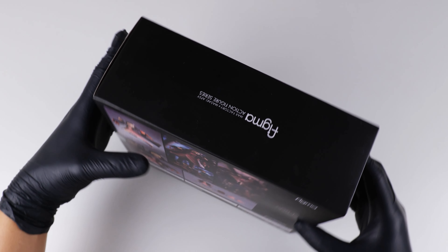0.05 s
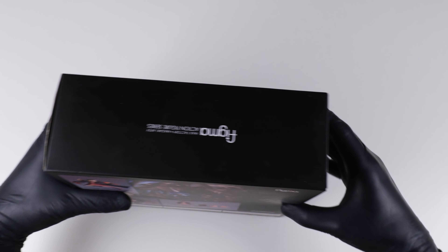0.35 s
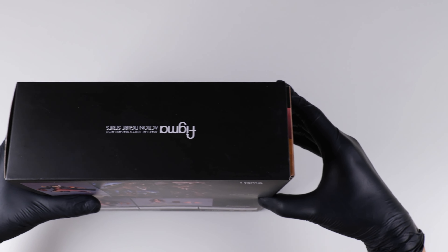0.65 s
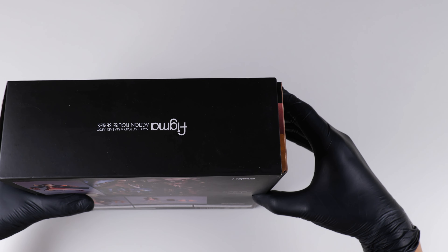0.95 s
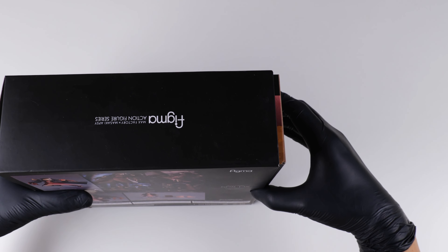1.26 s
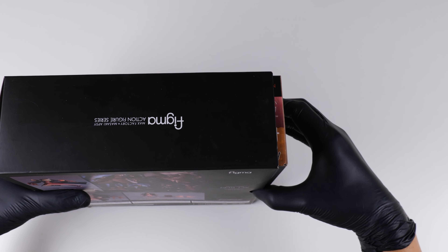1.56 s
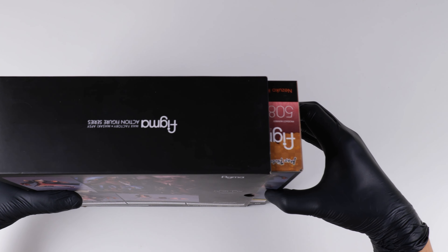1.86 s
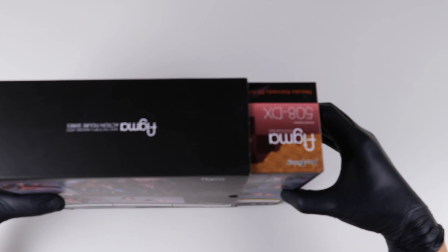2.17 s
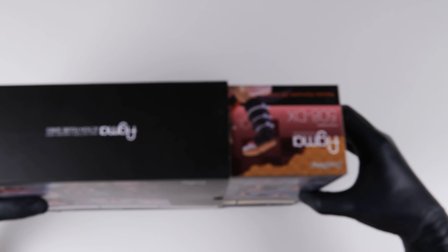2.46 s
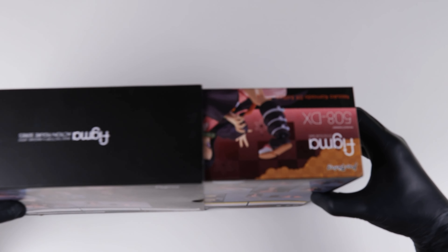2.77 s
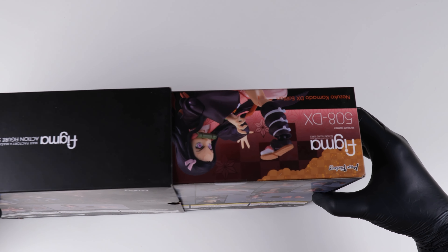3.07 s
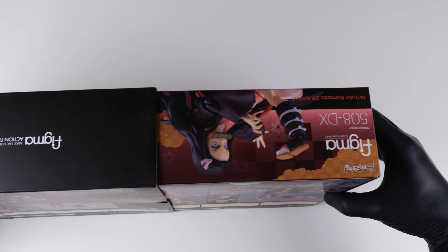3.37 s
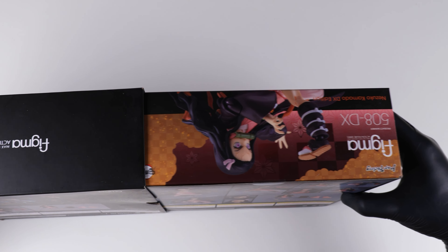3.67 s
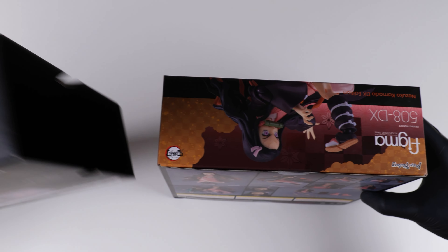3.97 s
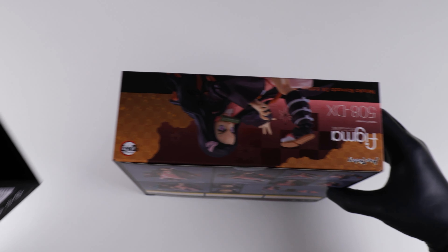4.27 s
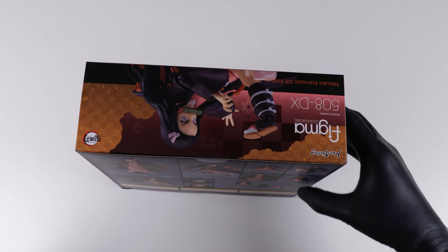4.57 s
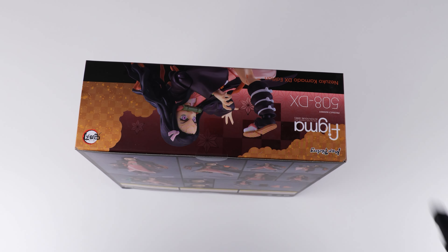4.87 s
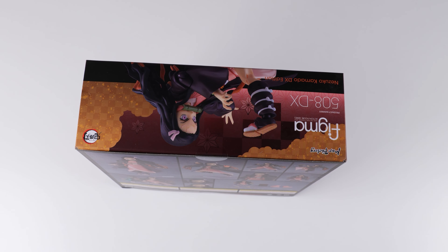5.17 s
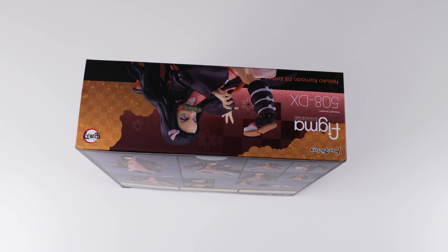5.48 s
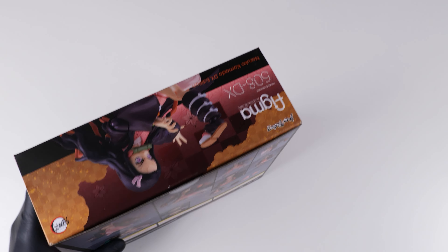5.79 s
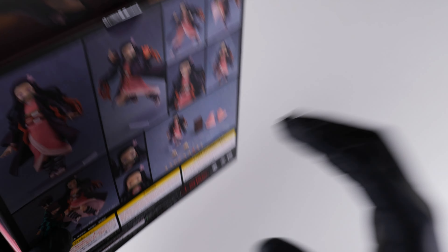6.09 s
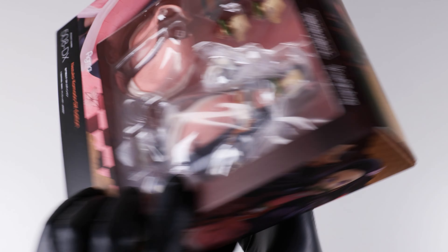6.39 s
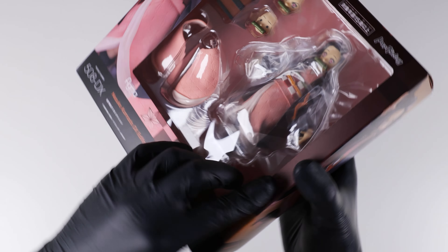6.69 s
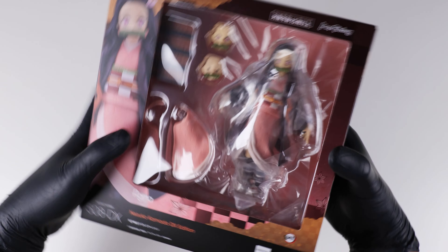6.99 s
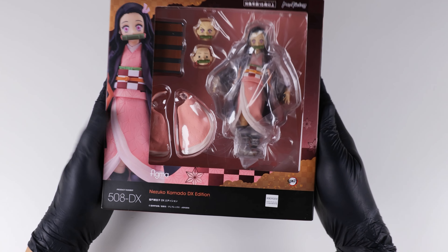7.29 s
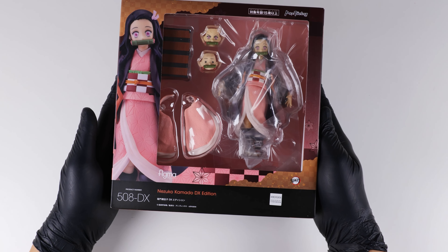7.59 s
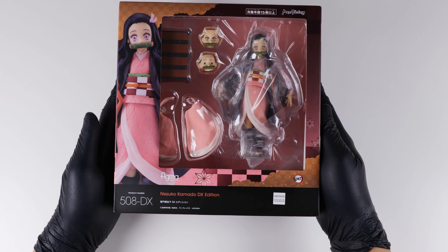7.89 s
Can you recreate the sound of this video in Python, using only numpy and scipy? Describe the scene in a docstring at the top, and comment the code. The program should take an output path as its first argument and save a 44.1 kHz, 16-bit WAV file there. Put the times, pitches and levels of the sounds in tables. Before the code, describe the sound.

Gloved hands slide a tight sleeve off a cardboard box, then flip the box with hollow knocks and plastic crackles.

```python
"""Gloved hands turn a cardboard box in a small quiet room, hissing and squeaking on the glossy print.
From 1.5 s the tight sleeve slides off, card rasping on card, until its lip scrapes over the end.
At 4 s the box is pushed over the table and set down with a thud. From 5 s it is flipped over:
hands and plastic tray knock on the walls, the hollow rings and the tray crackles."""
import sys
import numpy as np
from scipy import signal
from scipy.fft import rfft, irfft, next_fast_len
from scipy.io import wavfile

SR = 44100
rng = np.random.default_rng(int(sys.argv[2]) if len(sys.argv) > 2 else 0)


def waveform_to_disk(signal):
    """Save audio, clipped to [-1, 1], as 16-bit WAV at the path in sys.argv[1]."""
    frames = np.transpose(np.atleast_2d(signal))
    scaled = np.clip(frames, -1, 1) * 32767
    samples = np.round(scaled).astype(np.int16)
    wavfile.write(sys.argv[1], SR, samples)


N = 350154
TIME = np.arange(N) / SR
CUTOFF_HZ = 15600

# air and broad faces of the box: pitch_hz, level_db, t60_s
BOX_MODES = [(252.8, -10, 0.25), (326, -3, 0.065), (354.5, -3, 0.13), (398.8, -2, 0.11), (444.6, -6, 0.14),
             (556, -2.5, 0.13), (671, -1, 0.13)]
# stiff card walls: pitch_hz, level_db, t60_s
WALL_MODES = [(801, -1.5, 0.11), (864, -8, 0.19), (972, -11.5, 0.095), (1031, -3.5, 0.12),
              (1131, -3.5, 0.098), (1196, 3.5, 0.067), (1315, -0.5, 0.098), (1491, -0.5, 0.09),
              (1635, -6, 0.045), (1884, -4.5, 0.034), (2037, -5.5, 0.077), (2360, -3, 0.11)]
# rumble of the hollow box: freq_hz, level_db
RUMBLE_SPECTRUM = [(130, -34), (200, -12), (280, -9), (340, -3), (420, -3), (500, -5.5), (700, -8.5),
                   (1000, -8.5)]


def from_db(db):
    """Decibels to gain."""
    return np.exp(np.asarray(db) * (np.log(10) / 20))


def unit_rms(x):
    """Scale to unit power."""
    return x / np.sqrt(np.mean(x ** 2) + 1e-20)


def unit_onset(x):
    """Scale to unit power over the first 30 ms."""
    return x / np.sqrt(np.mean(x[:int(.03 * SR)] ** 2) + 1e-20)


def colour(x, spectrum, skirt_db_per_octave=30):
    """Filter by a freq_hz, level_db table, falling away beyond its ends."""
    hz, db = np.transpose(spectrum)
    size = next_fast_len(x.shape[-1], True)
    octave, points = np.log2(np.fft.rfftfreq(size, 1 / SR) + 1), np.log2(hz)
    beyond = np.abs(octave - np.clip(octave, points[0], points[-1]))
    gain = from_db(np.interp(octave, points, db) - skirt_db_per_octave * beyond)
    return irfft(rfft(x, size) * gain, size)[..., :x.shape[-1]]


def drift(rate_hz):
    """Random wander of unit power."""
    knots = rng.standard_normal(int(N / SR * rate_hz) + 2)
    return unit_rms(np.interp(TIME * rate_hz, np.arange(len(knots)), knots))


def add(track, start_s, sound):
    """Mix a short sound in."""
    start = max(int(start_s * SR), 0)
    track[start:start + len(sound)] += sound[:N - start]


def stroke(start_s, length_s, attack_s=0.013, slope_db_per_s=0, release_t60_s=0.21):
    """Gain of one rub: it sets in, holds or changes evenly, and dies away."""
    t = TIME - start_s
    held_db = slope_db_per_s * np.clip(t, 0, length_s)
    release_db = -60 * np.maximum(t - length_s, 0) / release_t60_s
    return np.clip(t / attack_s, 0, 1) * from_db(held_db + release_db)


def friction(spectrum, catches_per_s, catch_db, flutter_db):
    """Countless fibres brush past as smooth noise; now and then a bigger one catches and snaps free."""
    sizes = from_db(4 * np.minimum(rng.exponential(1, N), 4)) * rng.choice([-1, 1], N)
    catches = unit_rms(sizes * (rng.random(N) < catches_per_s / SR))
    force = rng.standard_normal(N) + from_db(catch_db) * catches
    return unit_rms(colour(force, spectrum) * from_db(flutter_db * drift(70)))


def resonance(length_s, pitch_hz, width_hz, glide_octaves=0):
    """Noise drives a resonance for a moment: a narrow one sings, a wide one rasps; the pitch can glide."""
    r = np.exp(-np.pi * 1.5 * width_hz / SR)
    section = [1 - r, 0, r - 1, 1, -2 * r * np.cos(2 * np.pi * pitch_hz / SR), r * r]
    count = int(length_s * SR)
    tone = signal.sosfilt([section, section], rng.standard_normal(count + SR // 8))[-count:]
    analytic = signal.hilbert(tone * np.sin(np.linspace(0, np.pi, count)))
    shift_hz = pitch_hz * (2 ** (glide_octaves * np.linspace(-.5, .5, count)) - 1)
    return unit_rms(np.real(analytic * np.exp(2j * np.pi * np.cumsum(shift_hz) / SR)))


def favour(modes, pitch_hz, db_per_octave):
    """Weaken modes with their distance from one pitch."""
    return [(hz, db + db_per_octave * abs(np.log2(hz / pitch_hz)), t60_s) for hz, db, t60_s in modes]


def struck(modes, t, vary_db, detune_share=.03):
    """Each blow lands elsewhere and meets another grip, shifting the modes' strengths and pitches."""
    hz, db, t60_s = np.transpose(modes)[:, :, None]
    strength, detune, sign = rng.standard_normal((3, len(modes), 1))
    phase = 2 * np.pi * hz * (1 + detune_share * detune) * t
    envelope = from_db(db + vary_db * strength - 60 * t / t60_s)
    return np.sum(np.sign(sign) * envelope * np.sin(phase), axis=0)


def burst(spectrum, t, t60_s, tail_db, tail_t60_s):
    """Modes too dense to tell apart: noise with a main decay and a weaker second one."""
    envelope = from_db(-60 * t / t60_s) + from_db(tail_db - 60 * t / tail_t60_s)
    return colour(rng.standard_normal(len(t)), spectrum) * envelope


def rubbed(force, modes, damping=1.2, shift_db=2.5):
    """A rubbing hand rings the modes and damps them; as it moves, now one leads, now another."""
    t = np.arange(SR // 8) / SR
    held = [(hz, db, t60_s / damping) for hz, db, t60_s in modes]
    leads_hz = np.geomspace(modes[0][0], modes[-1][0], 6)
    responses = [struck(favour(held, hz, db_per_octave=-11.5), t, vary_db=2) for hz in leads_hz]
    rings = [unit_rms(signal.oaconvolve(force, response)[:N]) for response in responses]
    shares = np.array([from_db(shift_db * drift(14)) for _ in leads_hz])
    return unit_rms(np.sum(shares * rings, axis=0) / np.linalg.norm(shares, axis=0))


def echoes(x, t60_s, delay_s):
    """A dense cloud of reflections of unit energy."""
    t = np.arange(SR // 2) / SR
    response = rng.standard_normal(len(t)) * from_db(-60 * t / t60_s) * (t > delay_s)
    return signal.fftconvolve(x, response / np.sqrt(np.sum(response ** 2)))[:N]


def room_tone(air_db=-63.5, hum_db=-70.5, hum_hz=120):
    """Ventilation noise and a faint mains hum."""
    # ventilation: freq_hz, level_db
    air_spectrum = [(15, -79), (25, -59), (86, -19.5), (107, -11), (205, -10.5), (268, -6.5), (299, -34),
                    (333, -13), (424, -11), (618, -14), (688, -10.5), (746, -13.5), (951, -25.5),
                    (9160, -37.5), (15700, -32)]
    air = unit_rms(colour(rng.standard_normal(N), air_spectrum))
    hum = np.sqrt(2) * np.sin(2 * np.pi * hum_hz * TIME) * from_db(1.2 * drift(7.2))
    return from_db(air_db) * air + from_db(hum_db) * hum


def push(start_s=3.99, length_s=0.468, attack_s=0.091, rumble_db=-63.5, rasp_db=-49.5, hiss_db=-60):
    """The box glides over the table; its whisper brightens as pressure eases and speed grows."""
    # card rasping on the table: freq_hz, level_db
    rasp_spectrum = [(350, -47), (600, -16), (648, -20), (707, -18), (778, -2), (1370, -3.5), (2620, 2.5),
                     (3240, -9), (6000, -18), (7800, -37), (13200, -120)]
    # card hissing on the table: freq_hz, level_db
    hiss_spectrum = [(2940, -6), (5000, -9.5), (7960, -5.5), (10400, 0), (11600, -4), (12500, -7),
                     (14300, -5), (15700, -16)]
    pressure = stroke(start_s, length_s, attack_s, slope_db_per_s=-24.5)
    speed = stroke(start_s, length_s, attack_s, slope_db_per_s=41)
    rumble = from_db(rumble_db) * friction(RUMBLE_SPECTRUM, 150, catch_db=-16, flutter_db=5)
    rasp = from_db(rasp_db) * friction(rasp_spectrum, 2100, catch_db=-22, flutter_db=-2)
    hiss = from_db(hiss_db) * friction(hiss_spectrum, 2500, catch_db=-17, flutter_db=0.5)
    return pressure * (rumble + rasp) + speed * hiss


def gloves(rasp_db=3, direct_db=-8, wall_gain=0.56):
    """Rubber drags over the print in jerks that sound hollow and walls; a light touch is brighter."""
    # glove rubs: start_s, length_s, attack_s, level_db, brightness_db, hollow_db
    strokes = [(-0.02, .62, .014, -66.5, 15, 2), (.11, 0.28, 0.011, -67, 15.5, -10),
               (.535, 0.093, 0.023, -53, -1, -8), (0.622, 0.14, .014, -64, 4.5, -4),
               (.76, .62, .012, -71.5, -4, 1), (1.3, 0.055, .025, -66, 2.5, -2),
               (1.56, .19, 0.083, -54, -13, -7), (4.454, 0.029, 0.0089, -49.5, -2, 2.5),
               (5.22, 0.17, 0.043, -58, -9, 2), (5.414, 0.04, 0.077, -48, -6, -4),
               (5.521, 0.054, 0.012, -49.5, -3.5, 3), (5.58, 0.11, 0.035, -60, 1.5, 0),
               (5.718, .28, .049, -52, 2, -3), (5.811, 0.029, 0.0034, -39.5, -17, 1),
               (5.919, .072, 0.019, -36, -4.5, -4.5), (6.139, .38, 0.0063, -50.5, -7, -2),
               (6.215, 0.027, .035, -51, -9, -11), (6.366, .08, 0.019, -37.5, -8.5, 2),
               (6.48, 0.074, .025, -42, 0, -2.5), (6.6, 0.023, 0.01, -46.5, -14.5, -4),
               (6.56, 0.19, .013, -56, 5.5, -3), (6.733, 0.021, 0.011, -43.5, -31, 1),
               (6.839, .3, 0.047, -57.5, -4, 5), (7.02, .18, 0.078, -49.5, .5, -11),
               (7.188, .14, .016, -56, 7.5, 2), (7.33, 0.061, .02, -54.5, -5.5, 5)]
    # rubber rasping on print: freq_hz, level_db
    rasp_spectrum = [(350, -40), (600, -17), (771, -6.5), (944, -1), (1440, 0), (1910, 2.5), (3330, -10),
                     (3740, -9), (5450, -15), (6000, -14), (7800, -15.5), (13200, -120)]
    # rubber hissing on print: freq_hz, level_db
    hiss_spectrum = [(2060, -18.5), (3500, -14), (6810, -8), (9440, -3), (10900, -5), (14600, -7),
                     (15700, -22)]
    power = np.array([from_db(db) * stroke(*timing) for *timing, db, _, _ in strokes]) ** 2
    brightness, hollowness = from_db(np.array(strokes)[:, 4:].T)
    jerks = friction(RUMBLE_SPECTRUM, 130, catch_db=-0.5, flutter_db=3.5)
    scrape = friction(rasp_spectrum, 330, catch_db=-7, flutter_db=2)
    rumble = unit_rms(from_db(direct_db) * jerks + rubbed(jerks, BOX_MODES))
    rasp = unit_rms(scrape + wall_gain * rubbed(scrape, WALL_MODES))
    hiss = friction(hiss_spectrum, 927, catch_db=-11, flutter_db=1)
    return (np.sqrt(hollowness ** 2 @ power) * rumble
            + np.sqrt(power.sum(axis=0)) * from_db(rasp_db) * rasp
            + np.sqrt(brightness ** 2 @ power) * hiss)


def short_tones():
    """Squeaks and groans of rubber and card, the box ringing after a knock, a brief crackle."""
    # short pitched sounds: start_s, length_s, pitch_hz, level_db, glide_octaves, q_factor
    tones = [(0.063, 0.08, 303, -62.5, -0.057, 9.4), (0.738, 0.2, 1610, -71, -0.13, 14),
             (0.801, 0.29, 330, -63, 0, 5), (1.017, 0.26, 305, -62.5, 0.016, 4.3),
             (1.015, 0.16, 1580, -72, -0.14, 10), (1.974, 0.03, 1564, -45.5, 0.024, 40),
             (2.137, 0.15, 261, -49, -0.18, 12), (2.525, 0.03, 1048, -43.5, -0.013, 29),
             (2.834, 0.07, 1360, -46.5, 0.0079, 9.9), (3.005, 0.069, 700, -57, 0.033, 15),
             (3.116, 0.055, 1035, -50, -0.12, 7.7), (3.426, 0.072, 1320, -42.5, -0.076, 12),
             (3.428, 0.085, 693, -52.5, 0.14, 23), (3.573, 0.072, 1140, -47.5, 0, 2.8),
             (4.77, 0.075, 4230, -74, -0.014, 24), (4.858, 0.13, 4040, -68, -0.074, 28),
             (4.9, 0.072, 3620, -71, -0.095, 10), (5.34, 0.37, 521, -58.5, 0, 18),
             (5.622, 0.032, 523, -44, 0.04, 30), (5.645, 0.052, 507, -54.5, -0.082, 29),
             (5.763, 0.004, 4000, -46, 0.041, 12), (5.7755, 0.003, 3200, -40, -0.056, 3.5),
             (5.84, 0.041, 360, -34, -0.052, 11), (5.909, 0.14, 397, -38, -0.019, 12),
             (6.5145, 0.006, 3400, -35.5, -0.16, 8.6), (6.681, 0.029, 5250, -52, 0, 28),
             (6.709, 0.014, 5230, -40.5, -0.0001, 34), (6.813, 0.09, 800, -48.5, -0.13, 36),
             (6.898, 0.053, 447, -44.5, 0.0092, 23), (6.973, 0.045, 448, -38, 0.021, 5.8),
             (7.274, 0.047, 490, -40, -0.25, 7.1), (7.341, 0.078, 592, -53.5, 0.17, 7.5)]
    out = np.zeros(N)
    for start_s, length_s, pitch_hz, level_db, glide_octaves, q_factor in tones:
        tone = resonance(length_s, pitch_hz, pitch_hz / q_factor, glide_octaves)
        add(out, start_s, from_db(level_db) * tone)
    return out


def thud(t, puff_db=-8, swell_s=.006):
    """The table top booms and a bumped panel pushes out a puff of air."""
    # table top: pitch_hz, level_db, t60_s
    table_modes = [(142.4, -7, 0.12), (158, -0.5, 0.15), (210, -6.5, 0.15), (243, -2, 0.14)]
    # displaced air: freq_hz, level_db
    puff_spectrum = [(25, -17), (50, -16), (90, -13.5), (160, 7.5), (260, 7)]
    boom = unit_onset(struck(table_modes, t, vary_db=-1))
    puff = unit_onset(burst(puff_spectrum, t, t60_s=0.51, tail_db=-27.5, tail_t60_s=.25))
    swell = (1 - np.exp(-t / swell_s)) ** 2
    return unit_onset((boom + from_db(puff_db) * puff) * swell)


def bumps():
    """The weight of the whole box lands on table or palm."""
    # landings: start_s, level_db
    landings = [(3.81, -54), (4.459, -50), (4.488, -56), (5.169, -49), (5.832, -49), (6.392, -37),
                (7.042, -56)]
    out, t = np.zeros(N), np.arange(SR // 3) / SR
    for start_s, level_db in landings:
        add(out, start_s, from_db(level_db) * thud(t))
    return out


def crackles(gain_db=-8, ring_db=-9, ring_cycles=30, rise_s=.0008):
    """Thin plastic buckles with a bright crack that rings the patch; the tray rustles after it."""
    # snaps of plastic and card edges: start_s, level_db, centre_hz
    snaps = [(0.139, -35, 11400), (0.261, -45, 2090), (0.533, -37, 3100), (0.534, -42, 6350),
             (2.138, -23, 2440), (4.459, -30, 8900), (4.527, -35, 3460), (4.527, -48, 8500),
             (4.917, -50, 12300), (5.166, -45, 8700), (5.316, -30, 11600), (5.798, -36, 3300),
             (5.803, -26, 2830), (5.803, -34, 7060), (5.817, -31, 8260), (5.837, -29.5, 8300),
             (5.916, -25, 1930), (5.95, -22, 4840), (5.97, -21, 8900), (5.975, -30, 6500),
             (6.003, -38, 5000), (5.984, -44, 7000), (6.021, -37, 4000), (6.051, -32, 2880),
             (6.14, -38, 3300), (6.151, -36, 8800), (6.155, -22, 11460), (6.16, -30, 10400),
             (6.194, -40, 2780), (6.21, -39.5, 2800), (6.252, -34, 4500), (6.303, -34, 2620),
             (6.336, -30, 2360), (6.336, -37, 7400), (6.356, -29.5, 2570), (6.394, -26.5, 2530),
             (6.395, -32, 6560), (6.433, -20.5, 9960), (6.444, -26, 9450), (6.471, -30.5, 2600),
             (6.479, -21.5, 2920), (6.499, -35.5, 3470), (6.586, -35, 3430), (6.607, -36.5, 3200),
             (6.712, -31, 11050), (6.724, -31.5, 8880), (6.759, -27, 1980), (6.92, -42.5, 8150),
             (7.034, -35.5, 9300), (7.046, -31.5, 3000)]
    # buckling patch: ratio_to_centre, level_db
    film_modes = [(.47, -10), (.72, -2.5), (1, 4), (1.21, -4.5), (1.62, -16)]
    out, t = np.zeros(N), np.arange(SR // 6) / SR
    head = SR // 250  # the first 4 ms set the level
    rise = 1 - np.exp(-(t / rise_s) ** 2)
    for start_s, level_db, hz in snaps:
        patch = [(hz * ratio, db, ring_cycles / hz) for ratio, db in film_modes if hz * ratio < CUTOFF_HZ]
        spectrum = [(hz / 4, -27), (hz / 2, -11), (hz, 0), (hz * 1.3, -4), (hz * 3, -19)]
        ring = rise * struck(patch, t, vary_db=0.5)
        crack = rise * burst(spectrum, t, t60_s=.014, tail_db=-12, tail_t60_s=0.12)
        snap = crack / np.std(crack[:head]) + from_db(ring_db) * ring / np.std(ring[:head])
        add(out, start_s, from_db(level_db + gain_db) * snap)
    return out


def hollow_thump(t, pitch_hz, rumble_db=-7, swell_s=0.0063):
    """The hollow of the box swells just after a blow and rings on."""
    ring = unit_onset(struck(favour(BOX_MODES, pitch_hz, db_per_octave=-16), t, vary_db=3))
    rumble = unit_onset(burst(RUMBLE_SPECTRUM, t, t60_s=0.14, tail_db=-9.5, tail_t60_s=0.34))
    swell = 1 - np.exp(-t / swell_s)
    return unit_onset((ring + from_db(rumble_db) * rumble) * swell)


def wall_clack(t, pitch_hz, hardness_db, bite, flex_rise_s=.0013):
    """A struck wall swings, cracks and rings; a harder contact adds swing and crack."""
    # first crack of the card: freq_hz, level_db
    crack_spectrum = [(450, -15), (750, -5.5), (1300, -5), (2000, -1), (2600, -20.5), (3600, -42)]
    crack = unit_onset(burst(crack_spectrum, t, t60_s=.028, tail_db=-20, tail_t60_s=.15))
    ring = unit_onset(struck(favour(WALL_MODES, pitch_hz, db_per_octave=-8), t, vary_db=3))
    flex = unit_onset(t * np.exp(-t / flex_rise_s) * np.sin(2 * np.pi * pitch_hz * t))
    crack_db, flex_db = -3.5 + 0.48 * hardness_db, -5.5 + 0.2 * hardness_db
    return unit_onset(bite * (ring + from_db(crack_db) * crack)) + from_db(flex_db) * flex


def knocks(thud_db=-23, thump_db=2.5, clack_db=-0.5, tick_db=-55.5, firm_db=-32, bite_s=0.002):
    """Hands and tray hit the box: a hard contact clacks and ticks, a soft one thumps."""
    # blows: start_s, level_db, hardness_db, hollow_hz, wall_hz
    blows = [(0.159, -66, -12, 350, 1500), (0.262, -60, 36, 390, 1930), (0.38, -50, -0.5, 520, 970),
             (0.534, -47.5, 7.5, 354, 1550), (1.257, -61.5, 0, 391.5, 1270), (1.34, -55.5, 11, 400, 1470),
             (1.547, -59.5, 5, 340, 1350), (1.607, -54, 8.5, 350, 1340), (1.75, -33.5, 3.5, 398, 1300),
             (2.139, -34.5, 0.5, 457, 1430), (2.572, -58, -4.5, 390, 1780), (2.646, -49, 12, 450, 1270),
             (2.897, -44.5, 6.5, 383, 1340), (3.778, -55.5, -10, 433, 2040), (3.806, -45.5, 0, 373, 1360),
             (4.075, -50.5, 10, 446, 1460), (4.423, -49.5, 11, 540, 1530), (4.458, -48.5, 6.5, 470, 1470),
             (4.527, -47, 19, 530, 1480), (5.163, -27.5, 9, 402, 1460), (5.189, -37.5, 2, 410, 1110),
             (5.256, -64, -8, 440, 1080), (5.527, -58.5, 4, 420, 1800), (5.628, -55, -3, 520, 1350),
             (5.815, -36.5, 15, 400, 1910), (5.832, -41, 4, 367, 1440), (5.854, -53, -16.5, 383, 1240),
             (5.915, -49, 40, 420, 1610), (5.977, -51, -13.5, 480, 1010), (6.02, -44, 3, 380, 1840),
             (6.254, -45, 19, 410, 1560), (6.357, -40.5, 3, 383, 1660), (6.391, -40, -4.5, 400, 1370),
             (6.401, -28, 1, 410, 1230), (6.413, -26.5, 8, 400, 1154), (6.452, -41.5, 10, 410, 1310),
             (6.48, -32, 10.5, 410, 1300), (6.494, -38.5, -4, 437, 1200), (6.525, -40, 0, 380, 1340),
             (6.548, -42.5, -3, 380, 1150), (6.726, -45.5, 11.5, 610, 1620), (6.758, -22.5, 14, 520, 1318),
             (6.78, -46, -8.5, 447, 1190), (6.826, -48, -2, 406, 1040), (6.955, -47, 0, 473, 1300),
             (6.975, -44.5, 2, 463, 950), (7.018, -36.5, -3, 410, 1200), (7.032, -34.5, 10.5, 410, 1210),
             (7.044, -31, 2.5, 398, 1310), (7.067, -35.5, 0.5, 400, 1130), (7.089, -43.5, -3, 400, 1145),
             (7.112, -52.5, -4, 400, 1370), (7.154, -37.5, -2.5, 426, 1230), (7.171, -33, -2, 425, 1240),
             (7.194, -53, 15, 400, 1236), (7.261, -46.5, 20, 510, 1290)]
    # tick of the card edge: freq_hz, level_db
    tick_spectrum = [(1800, 4), (3500, -2), (6000, -5.5), (10000, -6), (13000, -8), (15500, -15.5)]
    out, t = np.zeros(N), np.arange(SR // 4) / SR
    bite = 1 - np.exp(-t / bite_s)
    for start_s, level_db, hardness_db, hollow_hz, wall_hz in blows:
        soft_db = level_db - hardness_db
        edge_db = tick_db + 0.52 * (level_db - firm_db) + 0.42 * hardness_db
        thump = from_db(soft_db + thump_db) * hollow_thump(t, hollow_hz)
        clack = from_db(level_db + clack_db) * wall_clack(t, wall_hz, hardness_db, bite)
        edge = burst(tick_spectrum, t, t60_s=.045, tail_db=-6, tail_t60_s=.18)
        tick = from_db(edge_db) * unit_onset(edge * bite)
        add(out, start_s, from_db(soft_db + thud_db) * thud(t) + thump + clack + tick)
    return out


def judder(start_s, end_s, count, low_hz, high_hz):
    """A sliding panel catches on one resonance after another."""
    out = np.zeros(N)
    for when, pitch in rng.random((count, 2)):
        hz = low_hz * (high_hz / low_hz) ** pitch
        add(out, start_s + when * (end_s - start_s), resonance(.07, hz, width_hz=hz / 25))
    return out


def sleeve(rumble_db=-62, rasp_db=-42.5, judder_db=-52, groan_db=-56, full_pace_db=-48.5):
    """Card slides on card: the hiss grows with pace; the rasp and the hollow's murmur level off."""
    # pace of the sleeve, as its hiss: time_s, level_db
    pace = [(1.53, -65), (1.549, -82), (1.6, -84), (1.75, -54.5), (2.13, -43), (2.87, -45.5), (2.97, -50.5),
            (3.17, -49), (3.19, -52), (3.3, -45.5), (3.401, -48.5), (3.63, -43), (3.66, -50.5), (3.74, -37),
            (3.91, -48.5), (3.96, -71), (3.991, -68)]
    # card rasping on card: freq_hz, level_db
    rasp_spectrum = [(550, -26), (700, -14), (850, -19.5), (1050, -3), (1300, -1), (1650, -2), (2400, 1.5),
                     (3200, -1.5), (4300, -2), (5200, -9), (7000, -13.5)]
    # card hissing on card: freq_hz, level_db
    hiss_spectrum = [(2940, -14), (5000, -6), (6030, -9), (8190, -7), (9500, -5), (11100, -8),
                     (14100, -12.5), (15100, -17), (15700, -37)]
    times_s, levels_db = np.transpose(pace)
    start_s, end_s = times_s[0], times_s[-1]
    pace_db = np.interp(TIME, times_s, levels_db)
    drag_db = np.minimum(pace_db - full_pace_db, 0)
    overlap = np.interp(TIME, [start_s, end_s], [1, 0])  # share of the box still covered
    rasp = (from_db(rasp_db) * friction(rasp_spectrum, 1500, catch_db=-13, flutter_db=0.97)
            + from_db(judder_db) * judder(start_s, end_s, count=50, low_hz=1101, high_hz=2730)
            + from_db(groan_db) * judder(start_s, end_s, count=30, low_hz=762, high_hz=1438.5))
    murmur = (friction(RUMBLE_SPECTRUM, 150, catch_db=-17, flutter_db=1)
              + .6 * judder(start_s, end_s, count=24, low_hz=250, high_hz=700))
    binding_db = 1.04 * drift(21.42)  # the sleeve binds and frees itself
    hiss = friction(hiss_spectrum, 2400, catch_db=-23, flutter_db=0.8)
    out = stroke(start_s, end_s - start_s) * (
        from_db(rumble_db + 0.091 * drag_db) * murmur
        + from_db(0.82 * drag_db + binding_db) * overlap ** 0.19 * rasp
        + from_db(pace_db) * hiss)
    lip_scrape = from_db(-40) * resonance(length_s=0.11, pitch_hz=3326, width_hz=1600)
    add(out, start_s=3.686, sound=lip_scrape)
    return out


def scene():
    """The box is close and central; reflections from table and walls give a width that shifts."""
    # stereo width: freq_hz, side_minus_middle_db
    width = [(100, -22.5), (300, -22), (600, -14.5), (1200, -10.5), (2500, -8.5), (9000, -11),
             (14000, -5.5)]
    near = sleeve() + push() + gloves() + knocks() + bumps() + crackles() + short_tones()
    middle = near + from_db(-15) * echoes(near, t60_s=.28, delay_s=.008) + room_tone()
    turn_rad = 1.5 * drift(3)
    shares = np.cos(turn_rad), np.sin(turn_rad)
    reflections = sum(share * echoes(middle, t60_s=0.086, delay_s=0.00092) for share in shares)
    side = colour(reflections, width)
    return np.array([middle + side, middle - side])


def record(dry):
    """The microphone softens the highest treble and the top is cut steeply."""
    # microphone response: freq_hz, gain_db
    microphone = [(20, -4), (11500, -2), (13000, -7.5), (14500, -9.5), (15600, -14.5)]
    lowpass = signal.ellip(10, .1, 70, CUTOFF_HZ, fs=SR, output="sos")
    return signal.sosfiltfilt(lowpass, colour(dry, microphone))


dry = scene()
out = record(dry)
waveform_to_disk(out)
```